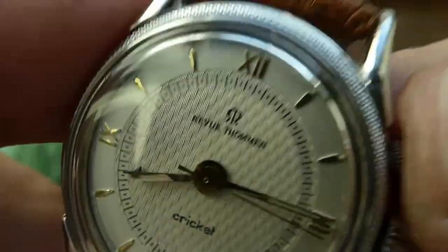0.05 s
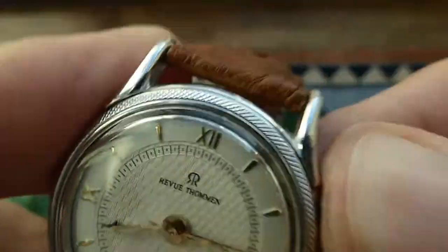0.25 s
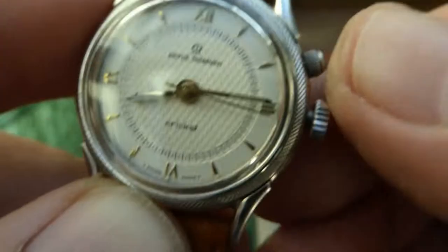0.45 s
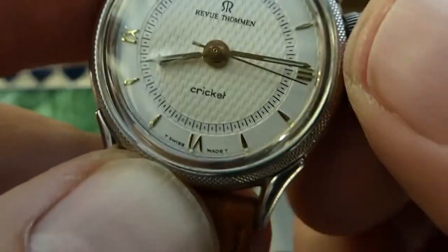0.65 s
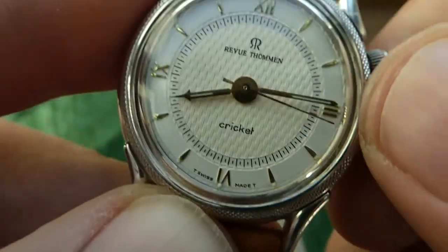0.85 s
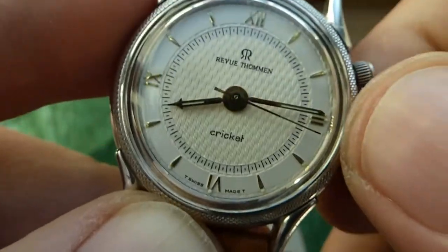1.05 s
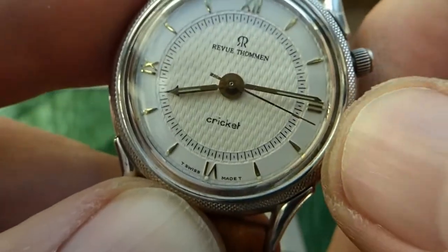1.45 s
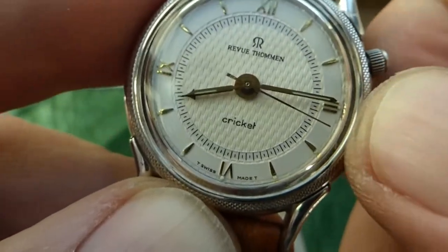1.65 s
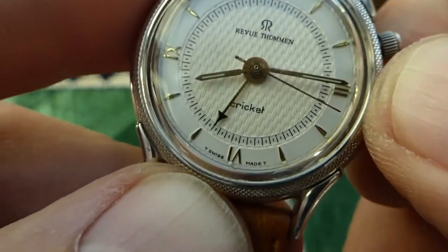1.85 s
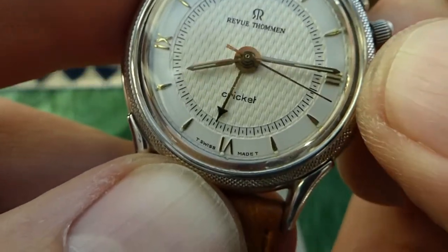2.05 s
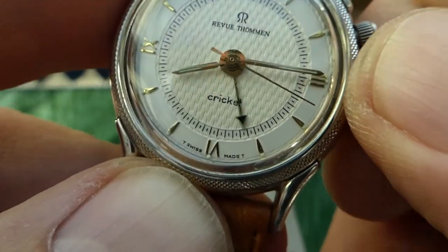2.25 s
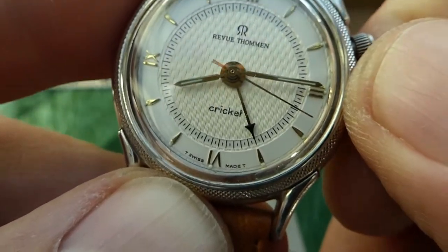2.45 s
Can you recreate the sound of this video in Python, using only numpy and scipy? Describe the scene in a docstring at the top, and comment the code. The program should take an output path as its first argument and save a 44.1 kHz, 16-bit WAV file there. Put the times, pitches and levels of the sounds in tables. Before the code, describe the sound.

One crisp, briefly ringing click comes from the knob of a wristwatch held near the microphone. After a faint rub of skin, turning the knob gives light, irregular ticks that quicken and stop, leaving soft room hiss.

```python
"""One sharp, ringing click, then a run of tiny ticks: a mechanical wristwatch handled up close.
The click is its crown (the little knob) snapping into position and setting the steel case ringing.
Fingers rub on the case as they shift their grip, then turn the crown, and a pawl (a small springy
catch) drops over twelve ratchet teeth in uneven spurts. Behind it all is the hiss of a quiet room."""
import sys
import numpy as np
from scipy import signal
from scipy.fft import rfft, irfft
from scipy.io import wavfile

SR = 44100
rng = np.random.default_rng(int(sys.argv[2]) if len(sys.argv) > 2 else 0)


def inscribe(sig):
    """Save sig as 16-bit PCM at rate SR to the path in sys.argv[1].

    A 1-D sig is mono; a 2-D sig holds one channel per row.
    Samples are clipped to [-1, 1] before scaling.
    """
    pcm = np.round(np.clip(np.atleast_2d(sig).T, -1, 1) * 32767)
    wavfile.write(sys.argv[1], SR, pcm.astype(np.int16))


N = 110250   # 2.5 seconds

SNAP_S, SNAP_DB = 0.2178, 0.5
# The tones the steel rings with. Ring time is how long a tone takes to fade by 60 dB.
# Columns: f/Hz, level/dB, ring time/s
STEEL_TONES = [(1540, -23, 0.0023), (2357, -39, 0.024), (3030, -42.5, 0.0015), (4200, -27, 0.01),
               (4450, -33, 0.027), (5540, -17.5, 0.00094), (6316, -28.5, .01), (7560, -24.5, 0.0067),
               (8600, -23.5, 0.0068), (9450, -12.5, 0.0038), (9720, -20, 0.022), (10200, -17, 0.0055),
               (11120, -13, 0.0022), (12560, -11, 0.0081), (12821, -7.5, 0.0033), (13500, -14, 0.0044),
               (14727, -14.5, 0.0041)]

def crown_snap():
    """The crown's stem jumps its notch and rebounds once; the steel rings and the case shimmers."""
    rebound_s, rebound_db = 0.0068, -20
    pan_db, lag_s = 1.5, 7e-6
    force = clicks([SNAP_S, SNAP_S + rebound_s], [SNAP_DB, SNAP_DB + rebound_db])
    steel = sum((-1) ** k * from_db(db) * ring(force, hz, ring_s)   # every other tone is flipped
                for k, (hz, db, ring_s) in enumerate(STEEL_TONES))
    # The case lingers on many tones packed close together.
    case_hz, width_hz = 4390, 790
    case_force = cut(force, "band", [case_hz - width_hz / 2, case_hz + width_hz / 2], order=2)
    shimmer = echoes(place(case_force, pan_db, lag_s), fade_s=0.12, shared=0.93)
    return place(steel, pan_db, lag_s) + from_db(-1) * shimmer


# The low tones of the watch and the hand around it. Columns: f/Hz, level/dB, ring time/s
KNOCK_TONES = [(188, -52, 0.012), (323, -24, 0.0089), (588, -34.5, 0.019)]

def knock(force):
    """A jolt makes a dull knock, which the fingers holding the watch quickly deaden."""
    thud = sum(from_db(db) * ring(force, hz, ring_s) for hz, db, ring_s in KNOCK_TONES)
    return cut(thud, "high", 124)


# The pawl's drops, one per tooth.
# Columns: t/s, level/dB, brightness/(dB per octave), extra ring of the spring/dB
TOOTH_DROPS = [(.7640, -3, 1, -2.5), (.8880, -4, -1.5, 3.5), (.9830, -4, -0.5, 2.5), (1.1212, -2.5, -1, -1),
               (1.1641, -3, -1, -0.5), (1.2922, -3.5, -1.5, 1.5), (1.3338, -2.5, -1, 0),
               (1.3995, -3.5, 3, -4), (1.4321, -2, -2.5, -3), (1.4619, -2, -2, -0.5),
               (1.5130, -3.5, 0.5, 0), (1.5486, -3.5, 0.5, -1)]
# The tones the pawl rings with. Columns: f/Hz, level/dB, ring time/s
PAWL_TONES = [(2350, -51, 0.033), (3890, -53, 0.002), (4140, -46.5, 0.023), (4490, -54, 0.045),
              (6320, -27.5, .0033), (7720, -30.5, 0.0071), (7930, -47, 0.013), (9750, -38, 0.0045),
              (9960, -31.5, 0.0039), (10730, -59, 0.016), (10750, -26.5, 0.0027), (12300, -44, 0.006),
              (12760, -33, 0.0029), (14800, -52, 0.0041)]
# Faint ticks from slack in the gears. Columns: t/s, level/dB
GEAR_TICKS = [(1.4048, -17), (1.4721, -14), (1.5562, -20), (2.1803, -25.5), (2.376, -24)]

def ratchet():
    """At each tooth the pawl slips, drops and bounces, never ringing quite the same; the gears tick."""
    spring_hz, spring_width_hz = 7850, 460
    bounce_s, bounce_db = 0.0008, -15
    times, drop_db, brightness, spring_db = np.transpose(TOOTH_DROPS)
    random_db = 0.8 * rng.standard_normal((len(times), len(PAWL_TONES)))
    bounce_times = times + bounce_s * (0.5 + rng.random(len(times)))
    light_taps = slips(times, drop_db) + clicks(*np.transpose(GEAR_TICKS))
    ringing = 0
    for k, (hz, db, ring_s) in enumerate(PAWL_TONES):
        near_spring = np.exp(-((hz - spring_hz) / spring_width_hz) ** 2)
        tone_db = brightness * np.log2(hz / spring_hz) + spring_db * near_spring
        hit_db = drop_db + tone_db + random_db[:, k]
        hits = clicks(times, hit_db) + clicks(bounce_times, hit_db + bounce_db)
        ringing += (-1) ** k * from_db(db) * ring(hits + light_taps, hz, ring_s)
    for _ in range(2):   # so small a part gives off very little low sound
        ringing = cut(ringing, "high", 2160)
    return from_db(-1) * place(ringing, pan_db=1.5, lag_s=2e-6)


def slips(drop_times, drop_db):
    """The pawl slips on the tooth's edge: a few weak, soft taps just before each drop."""
    taps, slip_s, slip_db = 3, 0.0032, -20.5
    times = drop_times[:, None] - slip_s * rng.random((len(drop_times), taps))
    force = clicks(times.ravel(), np.repeat(drop_db + slip_db, taps))
    return cut(force, "low", 9900)


# Skin rubbing on the case as the grip changes. Columns: middle t/s, half length/s, level/dB
SKIN_RUBS = [(0.08, 0.21, -63.5), (0.171, 0.03, -61), (0.586, 0.21, -57.5), (0.81, 0.067, -62.5),
             (1.3, 0.56, -72)]
# How strong the rubbing is from low to high pitch. Columns: f/Hz, relative level/dB
SKIN_COLOUR = [(100, -39), (250, 12), (700, 14), (1200, 9.5), (2800, 9), (5000, 2), (10000, -2),
               (15000, -12)]
# Fingertips bumping the case. Columns: t/s, level/dB
FINGER_BUMPS = [(0.167, -16.5), (.803, -17.5)]

def fingers():
    """Skin slides over the case with a soft hiss and bumps it twice."""
    pressure = sum(from_db(db) * swell(middle_s, half_s) for middle_s, half_s, db in SKIN_RUBS)
    rubbing = pressure * noise(lambda hz: from_db(at_hz(SKIN_COLOUR, hz)))
    return rubbing + knock(clicks(*np.transpose(FINGER_BUMPS)))


def room(sound):
    """A small room echoes the sound; the high notes die away sooner than the rest."""
    split_hz = 6500
    lows = echoes(cut(sound, "low", split_hz), fade_s=0.42, shared=0.3)
    highs = echoes(cut(sound, "high", split_hz), fade_s=0.13, shared=0.6)
    return from_db(-10.5) * lows + from_db(-14.5) * highs


# The quiet room's own noise, from low to high pitch. Columns: f/Hz, relative level/dB
ROOM_COLOUR = [(25, -19.5), (55, -21), (100, -11), (140, -7.5), (210, -2.5), (330, -5), (520, -5),
               (780, -7), (1100, -6.5), (1570, -12.5), (2630, -16), (5000, -18.5), (8000, -23.5),
               (10000, -20), (14300, -27), (15500, -36)]

def background():
    """The room hisses steadily, and a faint hollow drone fades away at the start."""
    drone_hz, width_hz = 452, 68
    drone = noise(lambda hz: 1 / (1 + ((hz - drone_hz) / width_hz) ** 2))
    drone *= swell(middle_s=0.012, half_s=0.12)
    hiss = noise(lambda hz: from_db(at_hz(ROOM_COLOUR, hz)))
    hiss_db = -59 + np.array([[-0.275], [0.275]])   # a touch louder on the right
    return from_db(hiss_db) * hiss + from_db(-56.5) * drone


# How alike the noise is in both ears. Columns: f/Hz, likeness (1 the same, -1 opposite)
EAR_LIKENESS = [(30, -0.28), (120, 0.56), (280, 0.57), (600, -0.24), (1200, -0.73), (2500, -0.17),
                (6000, 0.4), (14000, 0.52)]

def noise(gain_at):
    """Stereo noise from all around, shaped by a gain for each pitch, then scaled to strength 1."""
    hz = np.arange(N // 2 + 1) * SR / N
    alike = at_hz(EAR_LIKENESS, hz)
    common, opposite = rfft(rng.standard_normal((2, N))) * gain_at(hz)
    ears = irfft(np.sqrt(1 + alike) * common + np.sqrt(1 - alike) * opposite * [[1], [-1]], N)
    return ears / np.sqrt(np.mean(ears ** 2))


def from_db(db):
    """Turn decibels into a number to multiply by."""
    return 10 ** (np.asarray(db) / 20)


def at_hz(points, hz):
    """Read between a table's rows, giving each octave equal room."""
    row_hz, values = np.transpose(points)
    return np.interp(np.log(hz + 1), np.log(row_hz), values)


def clicks(times, db):
    """One instant push for each contact."""
    force = np.zeros(N)
    np.add.at(force, np.round(np.asarray(times) * SR).astype(int), from_db(db))
    return force


def ring(force, hz, ring_s):
    """Each push starts a pure tone that fades by 60 dB in ring_s."""
    decay, step = from_db(-60 / (ring_s * SR)), 2 * np.pi * hz / SR
    return signal.lfilter([0, np.sin(step)], [1, -2 * decay * np.cos(step), decay ** 2], force + 1e-18)


def swell(middle_s, half_s):
    """A bell-shaped rise and fall."""
    return np.exp(-((np.arange(N) / SR - middle_s) / half_s) ** 2)


def cut(sound, keep, hz, order=4):
    """Keep the "low", "high" or "band" part of a sound; a higher order cuts the rest more steeply."""
    return signal.sosfilt(signal.butter(order, hz, keep, fs=SR, output="sos"), sound + 1e-18)


def place(sound, pan_db, lag_s):
    """Put a sound a little to the left: it is earlier there, and its high notes are louder."""
    hz = np.arange(N // 2 + 1) * SR / N
    gap_db = pan_db * hz / 11000   # low notes bend around to both ears
    left = from_db(gap_db / 2)
    right = from_db(-gap_db / 2) * np.exp(-2j * np.pi * hz * lag_s)
    return irfft(rfft(sound) * np.array([left, right]), N)


def echoes(sound, fade_s, shared):
    """Dense echoes that fade by 60 dB in fade_s, partly shared by both ears."""
    t = np.arange(SR // 2) / SR
    white = rng.standard_normal((3, len(t)))
    tail = np.sqrt(shared) * white[2] + np.sqrt(1 - shared) * white[:2]
    build_up = 1 - np.exp(-t / (0.0073 * fade_s))
    tail *= build_up * from_db(-60 * t / fade_s)
    return signal.fftconvolve(sound, tail / np.sqrt(np.sum(tail ** 2) / 2), axes=1)[:, :N]


def scene():
    """The watch, its echoes off the hands, table and room, the fingers and the background."""
    snap, teeth = crown_snap(), ratchet()
    jolt = knock(clicks([SNAP_S - 0.00061], [SNAP_DB]))   # the snap's knock comes just before its ring
    hands_and_table = from_db(-8) * echoes(snap + teeth, fade_s=0.028, shared=0.6)
    walls = room(snap + jolt + from_db(-0.5) * teeth)   # the thumb shields the ratchet a little
    return snap + teeth + jolt + hands_and_table + walls + fingers() + background()


def record(dry):
    """Cut off the very highest pitches steeply."""
    return cut(dry, "low", 15500, order=24)


dry = scene()
out = record(dry)
inscribe(out)
```